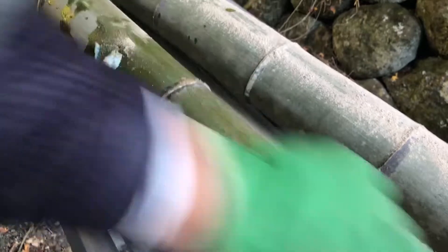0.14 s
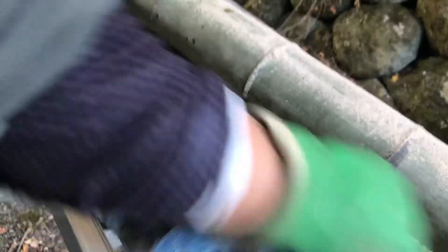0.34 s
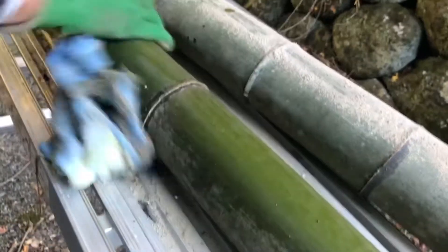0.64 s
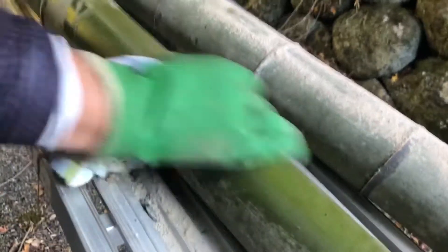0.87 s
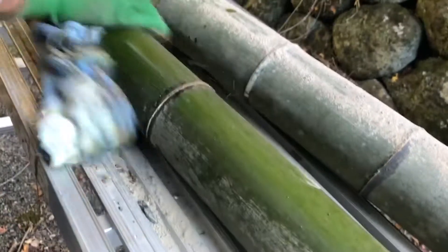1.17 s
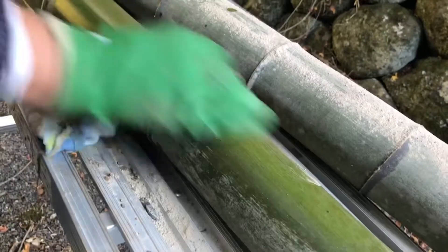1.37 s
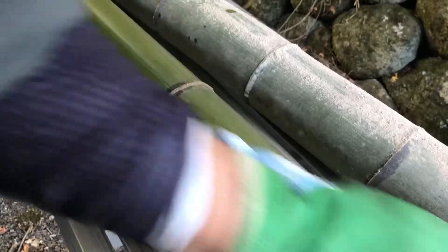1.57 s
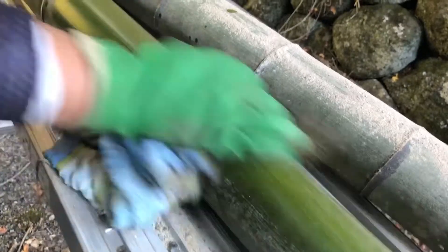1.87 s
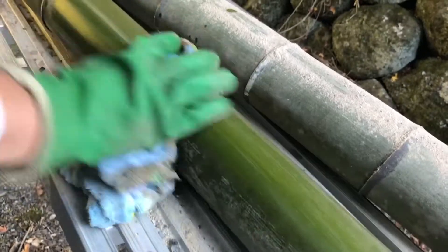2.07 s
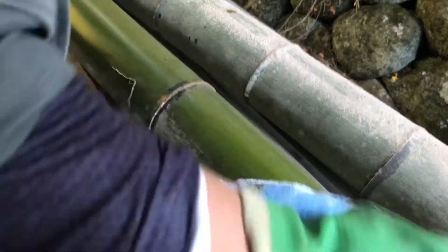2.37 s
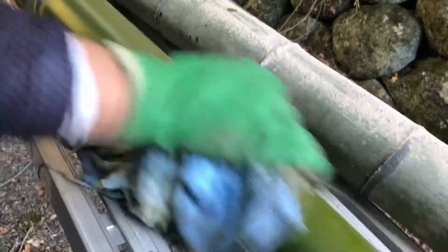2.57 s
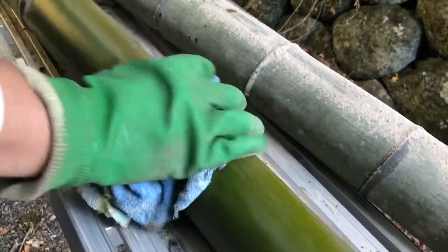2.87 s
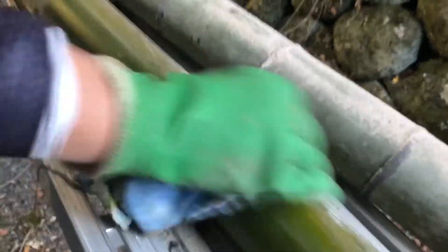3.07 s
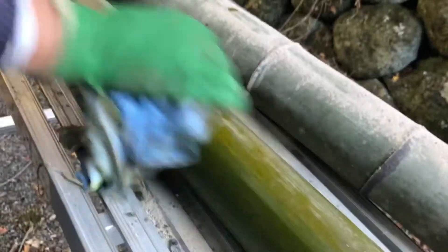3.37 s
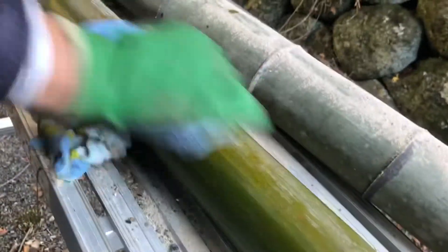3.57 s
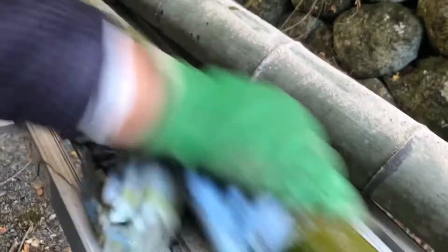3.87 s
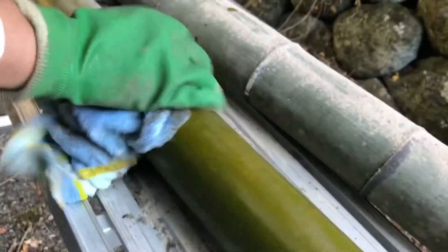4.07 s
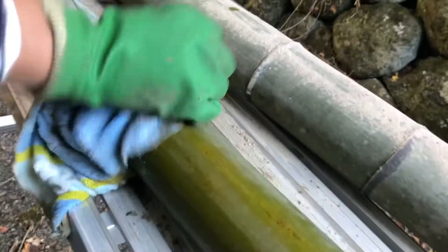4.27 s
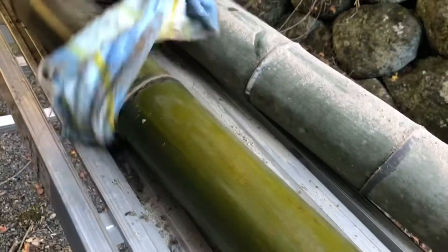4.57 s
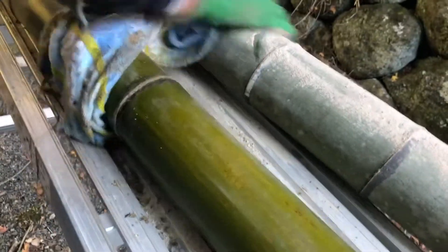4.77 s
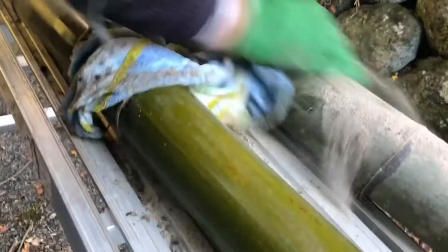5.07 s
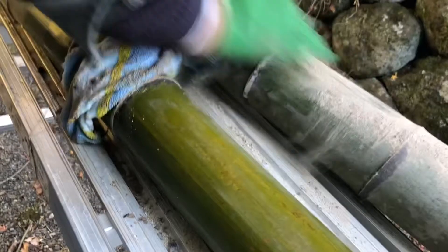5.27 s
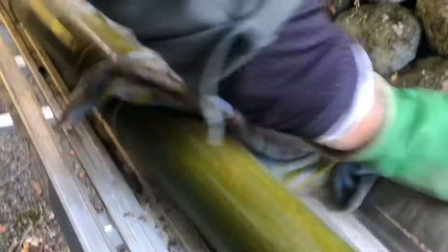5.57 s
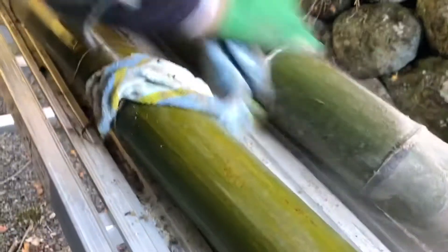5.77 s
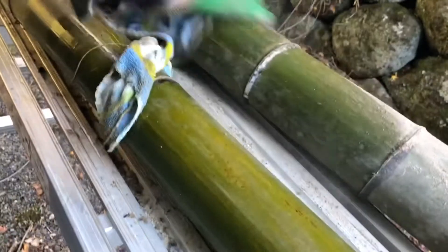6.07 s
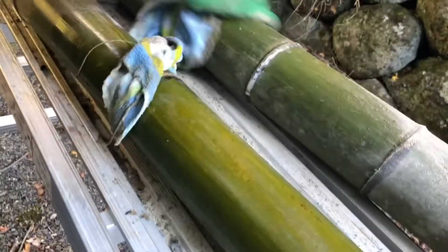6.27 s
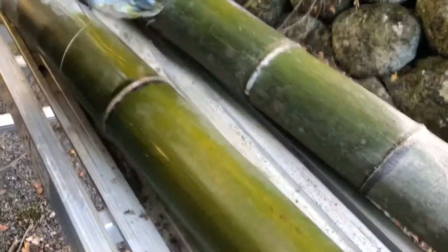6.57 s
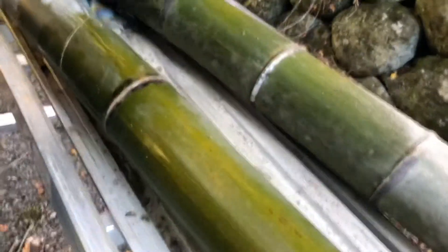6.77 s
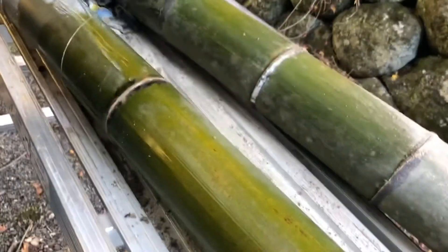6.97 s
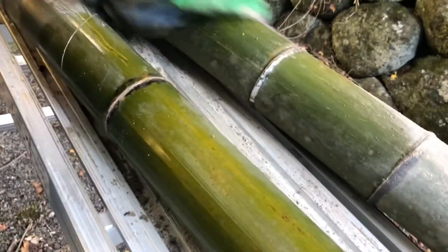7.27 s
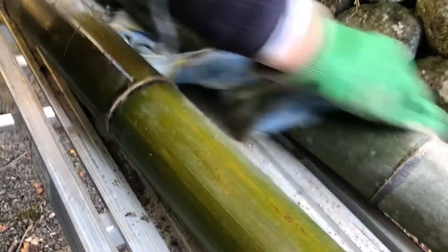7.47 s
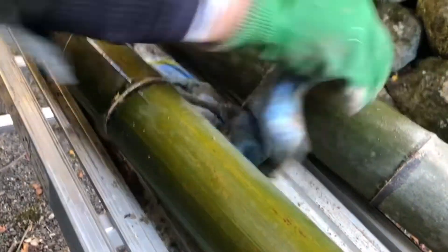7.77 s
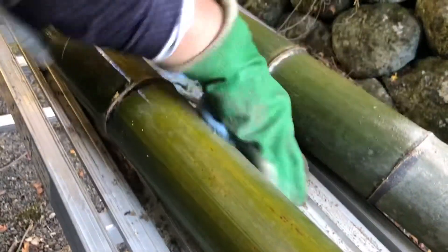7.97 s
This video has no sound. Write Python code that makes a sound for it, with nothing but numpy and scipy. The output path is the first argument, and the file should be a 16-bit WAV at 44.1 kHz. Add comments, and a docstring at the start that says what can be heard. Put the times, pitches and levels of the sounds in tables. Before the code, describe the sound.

Outdoors and very close, a damp cloth rubs a bamboo pole in fast irregular strokes, bright and hissy at first, then softer and coarser. Short rasps, wet ticks and a few hollow knocks break in. Clothing drags over the body-worn microphone, with dull stuttering rumbles and thuds growing heaviest around the middle. Faint, low, steady air lies beneath.

```python
"""Outdoors, a gloved hand scrubs a bamboo pole with a damp cloth, back and forth.
Random fibre slips, coloured into hiss, scrub and fizz, follow the speed of each stroke; snags rasp as
filtered noise bursts, wet ticks are short noise decays, and the pole knocks on its metal rest as damped modes.
The worker's clothing drags on the body-worn microphone as dull stuttering slips and bumps it
with short bursts of low tones. Quiet outdoor air, a steady coloured noise, lies underneath."""
import sys
import numpy as np
from scipy import signal
from scipy.fft import rfft, irfft, next_fast_len
from scipy.io import wavfile
from scipy.ndimage import uniform_filter1d, map_coordinates

SR = 44100
rng = np.random.default_rng(int(sys.argv[2]) if len(sys.argv) > 2 else 0)


def log_audio(samples):
    """Write samples as a 16-bit WAV file to the path given in sys.argv[1]."""
    # one column per channel
    frames = np.atleast_2d(samples).T
    # limit to full scale, then quantise
    limited = np.clip(frames, -1, 1)
    pcm = np.round(limited * 32767).astype(np.int16)
    wavfile.write(sys.argv[1], SR, pcm)


N = 358563  # length of the scene in samples


def amp(db):
    """Decibels to gain."""
    return 10 ** (np.asarray(db) / 20)


def unit(x):
    """Scale to rms 1."""
    return x / np.sqrt(np.mean(x ** 2) + 1e-20)


def wobble(rate, size=0):
    """A smooth random curve, rate knots a second; as long as the scene unless a size is given."""
    size = size or N
    knots = rng.standard_normal(int(size * rate / SR) + 4)
    return map_coordinates(knots, [np.arange(size) * rate / SR])


def releases(rate, fade_s):
    """Sudden random jumps, rate a second, that fade again; mean 0, rms 1."""
    happens = rng.random(N) < rate / SR
    jumps = signal.lfilter([1], [1, -np.exp(-1 / (fade_s * SR))], happens)
    return unit(jumps - jumps.mean())


def slips(rate, spread_db):
    """Tiny stick-slip releases at random times, rate a second, of uneven size; rms 1."""
    happens = rng.random(N) < rate / SR
    size = amp(spread_db * np.clip(rng.standard_normal(N), -2, 2))
    return unit(happens * size * rng.choice([-1, 1], N))


def filtered(x, response):
    """x times a response of frequency."""
    size = next_fast_len(len(x) + 8192)
    spectrum = rfft(x, size) * response(np.fft.rfftfreq(size, 1 / SR))
    return irfft(spectrum, size)[:len(x)]


def coloured(x, spectrum):
    """x shaped by (Hz, dB) points joined along log frequency, at rms 1."""
    f, db = np.transpose(spectrum)
    return unit(filtered(x, lambda hz: amp(np.interp(np.log(hz + 1), np.log(f), db))))


def edge(x, hz, kind, order):
    """Causal low-pass or high-pass."""
    sos = signal.butter(order, min(hz, .45 * SR), kind, fs=SR, output='sos')
    return signal.sosfilt(sos, x)


def add(track, s, sound):
    """Mix a sound into the track at time s."""
    part = track[max(round(s * SR), 0):][:len(sound)]
    part += sound[:len(part)]


def speed(start, length, peak_share):
    """A move speeds up from rest to 1 and slows to rest again, along quarter sines."""
    fastest = start + length * np.clip(peak_share, .05, .95)
    phase = np.interp(np.arange(N) / SR, [start, fastest, start + length], [0, 1, 0])
    return np.sin(np.pi / 2 * phase)


# Strokes of the hand, levels before the layer trims in cloth(): start_s, length_s,
# peak_share (share of the length at which the hand is fastest), hiss_db, scrub_db (re hiss),
# fizz_db (re hiss), easing_db (rate at which pressure eases, per whole stroke; negative presses harder)
STROKES = [(-0.087, 0.38, 0.097, -28.5, -3.5, -2.5, -9), (0.257, 0.22, 0.46, -30, -7, -8, 18),
           (0.41, 0.27, 0.54, -33, -8.5, 2, 3), (0.652, 0.3, 0.64, -30, -10.5, -1, -2),
           (0.944, 0.26, 0.41, -31.0, -10.5, -1, 6), (1.196, 0.28, 0.65, -29.5, -9.5, -1, -3),
           (1.376, 0.3, 0.31, -31, -6.5, -9.5, -8), (1.677, 0.3, 0.27, -31.5, -5, -3, 7),
           (1.995, 0.41, 0.54, -41, -6, -5.5, 7), (2.376, 0.63, 0.077, -45.5, 0, -6, -8),
           (2.698, 0.12, 0.75, -41, -2, -2, 6), (2.926, 0.28, 0.77, -41, 3.0, -7.5, 2),
           (3.187, 0.33, 0.31, -38, -4, -2.5, 5), (3.47, 0.29, 0.76, -36.5, -13, -1.5, 4),
           (3.76, 0.26, 0.35, -35.5, -7.5, -1, 18), (3.983, 0.34, 0.34, -44.5, -3.5, -3, 5),
           (4.399, 0.18, 0.86, -56.5, -14, 3.5, 0.5), (4.654, 0.34, 0.58, -36, -4, -6.5, -6),
           (4.983, 0.21, 0.47, -34.5, -3.5, -1.5, 6), (5.191, 0.372, 0.22, -36.0, 1, -4, -8),
           (5.555, 0.4, 0.28, -35.5, -4, 1.5, 11), (5.955, 0.22, 0.61, -35, -10.5, 4, 1),
           (6.151, 0.46, 0.35, -40.5, -5, 3.5, -11), (6.563, 0.29, 0.39, -40.5, -0.5, 0.5, -3.0),
           (6.84, 0.22, 0.25, -42, -6.5, -0.5, -10), (7.03, 0.35, 0.58, -40.5, -1.5, 1, 8),
           (7.28, 0.31, 0.36, -38.5, -0.5, -2, -9), (7.562, 0.17, 0.61, -44.0, 4, 2.5, 4.0),
           (7.87, 0.14, 0.69, -47, -0.5, 0, 8.0), (8.022, 0.17, 0.44, -42.0, -1, -2.5, -11)]
SPEED_LAW = 1  # friction noise grows as this power of the hand's speed
FIZZ_PER_EASING = 1  # dB of fizz gained for each dB of scrub lost as the hand eases
EASING_FROM = 0.16  # share of a stroke for which the pressure holds before it starts to ease
REST_DB, REST_FIZZ_DB = -55.5, -61.5  # the cloth still creeps between strokes; before the layer trims


def strokes():
    """Gains of hiss, scrub and fizz: all follow the hand's speed; easing the pressure trades scrub for fizz."""
    t = np.arange(N) / SR
    power = np.outer(amp([REST_DB, REST_DB, REST_FIZZ_DB]) ** 2, np.ones(N))
    for start, length, peak_share, db, scrub_db, fizz_db, easing_db in STROKES:
        hand = speed(start, length, peak_share)
        moving = hand > 0
        share = (t[moving] - start) / length
        eased_db = easing_db * (np.maximum(share, EASING_FROM) - .5)  # zero at mid-stroke
        hiss_db = np.zeros_like(eased_db)
        colour = amp([hiss_db, scrub_db - eased_db, fizz_db + FIZZ_PER_EASING * eased_db])
        power[:, moving] += (amp(db) * hand[moving] ** SPEED_LAW * colour) ** 2
    return np.sqrt(power)


# Spectra of the fibre hiss, the coarse scrub and the finest fizz: freq_hz, level_db (relative, per Hz)
HISS_SPECTRUM = [(900, -21), (2000, -16), (3000, -2.5), (4200, 0), (4900, -0.5), (6000, 2), (7300, 1.5),
                 (8700, 1), (10500, -2.5), (14000, -11.5)]
SCRUB_SPECTRUM = [(200, -16), (450, -8), (750, 1), (1200, -1), (1600, 0.5), (2200, -1), (2900, -3),
                  (4500, -7), (9000, -23)]
FIZZ_SPECTRUM = [(6000, -25), (9000, -3.5), (11000, 0), (12500, 1), (14000, 1), (15800, -2)]


def cloth():
    """Countless fibres slip on the cane: a light touch fizzes, a pressed wad scrubs lower and coarser."""
    hiss_gain, scrub_gain, fizz_gain = strokes()
    # snagged threads let go at once, then the grip builds up again
    grip_db = 1.4 * releases(rate=45, fade_s=0.028) + 0.8 * wobble(170)
    fibres = shifting(slips(rate=9000, spread_db=-0.5), depth_db=1.83)
    threads = slips(rate=3000, spread_db=1.5)
    nap = shifting(slips(rate=19000, spread_db=4.5), depth_db=1.5)
    # layer trims in dB: hiss -1.07, fizz 2.1, scrub -1.08
    hiss = amp(-1.07) * hiss_gain * coloured(fibres, HISS_SPECTRUM)
    fizz = amp(2.1) * fizz_gain * coloured(nap, FIZZ_SPECTRUM)
    scrub_sway = amp(1.15 * wobble(35) - 1.08)
    scrub = scrub_sway * scrub_gain * coloured(threads, SCRUB_SPECTRUM)
    return amp(grip_db) * (hiss + fizz + scrub)


def shifting(x, depth_db):
    """The folds of the cloth form passing resonances: patches in time and frequency."""
    z = signal.stft(x, nperseg=512)[2]
    field = rng.standard_normal(z.shape)
    field = uniform_filter1d(field, size=6, axis=0)  # smooth over frequency
    field = uniform_filter1d(field, size=14, axis=1)  # smooth over time
    return signal.istft(z * amp(depth_db * unit(field)), nperseg=512)[1][:N]


# Snags of the cloth on the cane: middle_s, level_db (before a -0.06 dB trim),
# length_s (from the middle until the swell falls to 1/e), bright_hz (low-pass)
CATCHES = [(0.035,-54,0.032,13000), (0.1,-45.5,0.13,1070), (0.171,-26.5,0.0071,1090),
           (0.547,-29,0.015,10000), (0.811,-24,0.011,10000), (1.087,-25.5,0.014,10000),
           (1.342,-26.5,0.016,11600), (1.556,-36.5,0.048,2210), (2.268,-33,0.017,11500),
           (3.043,-27.5,0.013,14500), (3.129,-34,0.01,9100), (3.672,-31.5,0.015,14200),
           (3.707,-32.5,0.022,4530), (4.201,-38.5,0.028,6150), (5.268,-32,0.0092,9300),
           (5.411,-33.5,0.014,3200), (5.782,-36,0.0088,2500), (6.271,-41,0.008,4000), (6.36,-38,0.027,5000),
           (6.674,-31,0.016,5500), (7.204,-32,0.015,13000), (7.409,-26.5,0.0076,11800),
           (7.484,-34,0.014,2180), (7.9,-41,0.012,8000), (7.969,-40.5,0.0064,6000)]
CATCH_LOW_SHARE = 0.14  # lower edge of a rasp as a share of its brightness


def catches():
    """The cloth snags on a joint or a rough patch and tears free with a short rasp."""
    out = np.zeros(N)
    t = np.arange(-SR // 8, SR // 8) / SR
    for s, db, length, bright_hz in CATCHES:
        grain_db = 2 * rng.standard_normal(len(t)) + 3.1 * wobble(218.5, size=len(t))
        grains = rng.standard_normal(len(t)) * amp(grain_db)
        rasp = edge(grains, bright_hz, 'low', order=3)
        rasp = edge(rasp, 620, 'high', order=3)
        rasp = unit(edge(rasp, CATCH_LOW_SHARE * bright_hz, 'high', order=1))
        swell = np.exp(-(t / length) ** 2)
        add(out, s + t[0], amp(db - 0.06) * rasp * swell)
    return out


# Small wet ticks: time_s (each sounds 1.9 ms later), peak_db (before the high-pass)
TICKS = [(1.23, -20.5), (2.5867, -18), (2.6929, -18.5), (4.681, -22), (4.877, -20), (5.5625, -22.5),
         (7.0394, -27.5)]


def ticks():
    """Wet cloth and rubber glove peel off the cane with small ticks: noise with a fast and a slow decay."""
    out = np.zeros(N)
    t = np.arange(SR // 10) / SR
    for s, db in TICKS:
        decay = amp(-60 * t / 0.015) + amp(-2 - 60 * t / 0.088)
        tick = decay * rng.standard_normal(len(t))
        add(out, s + 0.0019, amp(db) * tick / np.abs(tick).max())
    return edge(out, 790, 'high', order=1)


# Knocks of the pole on its rest: start_s, ring_db, clack_db, clack_hz (low-pass), pitch_ratio,
# free_share (share of the free ring time that the hand leaves)
KNOCKS = [(2.552, -31.5, -27, 1700, .82, 0.34), (3.024, -19, -26, 1130, 0.98, 0.62),
          (4.329, -47, -35, 2100, 0.76, 0.63)]
# Modes of pole and rest: pitch_hz (at pitch ratio 1), level_db (re ring), t60_s (ringing free)
POLE_MODES = [(131.8, -2, 1), (260, -4, 0.63), (482, -4, 0.18), (545, 0, 0.53), (740, -5.5, 0.15),
              (1022, -6, 0.19), (1389, -20, .25), (1599, -23, .2)]


def pole():
    """The hollow pole rocks against its rest and rings; the hand damps it and makes the ring shudder."""
    out = np.zeros(N)
    t = np.arange(SR // 2) / SR
    for s, ring_db, clack_db, clack_hz, ratio, free in KNOCKS:
        ring = np.zeros(len(t))
        for hz, db, t60 in POLE_MODES:
            cycles = hz * ratio * t + 0.042 * wobble(53, size=len(t))
            ring += amp(db - 60 * t / (t60 * free)) * np.sin(2 * np.pi * cycles)
        clack = edge(rng.standard_normal(len(t)), clack_hz, 'low', order=4)
        clack = unit(edge(clack, 0.16 * clack_hz, 'high', order=2))
        knock = amp(ring_db) * ring + amp(clack_db - 60 * t / 0.07) * clack
        attack = 1 - np.exp(-t / 0.00065)
        add(out, s, knock * attack)
    return out


# Arm moves that drag clothing over the microphone, levels before the trims in clothing():
# start_s, length_s, rumble_db, flutter_db (re rumble)
DRAGS = [(0.314,0.087,-29,-6), (0.591,0.14,-29.5,-3), (0.837,0.027,-31,-16), (0.98,0.089,-29.5,-9),
         (1.189,0.13,-24.5,-14), (1.361,0.032,-27.5,-8), (1.502,0.061,-24,-11), (1.684,0.059,-28,-13),
         (1.753,0.2,-27.5,-15), (2.287,0.13,-22.5,-8.5), (2.467,0.12,-27,-9.5), (2.606,0.18,-30.5,-17.5),
         (2.881,0.3,-27,-5.5), (3.296,0.22,-19.5,-8), (3.485,0.15,-13,-9), (3.605,0.17,-19,-7),
         (4.017,0.1,-21.5,-19), (4.466,0.4,-24.5,-8), (4.84,0.12,-19,-2.5), (5.006,0.2,-21.5,-1),
         (5.175,0.078,-18,-4.5), (5.306,0.15,-17,-6.5), (5.592,0.089,-27.5,-11.5), (5.902,0.06,-24.5,-9),
         (6.02,0.18,-31,-13), (6.593,0.17,-27.5,-6.5), (6.768,0.047,-28,-20), (7.004,0.061,-25,-22),
         (7.299,0.25,-22,-3.5), (7.493,0.41,-27.5,-7)]
# Light contact of the clothing between drags, joined by straight lines: time_s, rumble_db (before trim)
CONTACT = [(0, -53), (0.16, -55.5), (0.3, -36.5), (1.85, -42.5), (2.1, -51.5), (2.2, -40), (3.3, -39.5),
           (3.85, -42.5), (4.3, -39), (4.45, -29), (5.3, -24.5), (5.55, -38.5), (6.5, -36), (7.3, -35.5),
           (7.95, -29.5), (8.13, -43)]
DRAG_PEAK_SHARE, DRAG_LAW = 0.46, 0.67  # where a drag is fastest; its noise grows as this power of its speed
CONTACT_FLUTTER_DB = -12.5  # flutter re rumble in light contact


def drags():
    """Gains of rumble and flutter: each move of the arm swells and fades over the light contact."""
    contact_s, contact_level = np.transpose(CONTACT)
    contact_db = np.interp(np.arange(N) / SR, contact_s, contact_level)
    power = amp([contact_db, contact_db + CONTACT_FLUTTER_DB]) ** 2
    for start, length, db, flutter_db in DRAGS:
        arm = speed(start, length, DRAG_PEAK_SHARE)
        moving = arm > 0
        power[:, moving] += np.outer(amp([db, db + flutter_db]), arm[moving] ** DRAG_LAW) ** 2
    return np.sqrt(power)


# Spectra of the dull rumble, the flutter and the crumpling fabric: freq_hz, level_db (relative, per Hz)
RUMBLE_SPECTRUM = [(22, -47), (31, -21), (45, -1), (68, 4.5), (105, 1.5), (170, -6), (250, -15.5),
                   (450, -55), (900, -80)]
FLUTTER_SPECTRUM = [(90, -44), (170, 1), (250, 2.5), (380, -6), (550, -12), (850, -28.5), (1400, -40.5),
                    (3000, -86)]
CRUMPLE_SPECTRUM = [(300, -26), (500, 0), (700, -1), (1000, -8), (1400, -12), (2500, -59)]
# small folds give way at random, each lifting the level for a moment; FOLD_DB is the most they can shift it
FOLDS_PER_S, FOLD_FADE_S, FOLD_DB = 14, 0.046, 2.5
CRUMPLE_DB, CRUMPLE_LAW = -4, 1.625  # hard drags crumple the fabric: grows as this power of the flutter gain


def clothing():
    """Fabric stutters over the microphone housing, which passes on only dull thuds."""
    rumble_gain, flutter_gain = drags()
    folds_db = FOLD_DB * np.tanh(releases(FOLDS_PER_S, FOLD_FADE_S))
    lumps_db = 2 * np.tanh(wobble(35)) + folds_db
    rumble = coloured(slips(rate=700, spread_db=2.0), RUMBLE_SPECTRUM)
    rumble = amp(lumps_db + 0.26) * rumble_gain * rumble
    stutter = amp(lumps_db + 6.26 * np.tanh(wobble(60)) - 2.5)
    flutter = flutter_gain * coloured(slips(rate=600, spread_db=1), FLUTTER_SPECTRUM)
    crumple = coloured(slips(rate=350, spread_db=0.0), CRUMPLE_SPECTRUM)
    crumple = amp(CRUMPLE_DB) * flutter_gain ** CRUMPLE_LAW * crumple
    return rumble + stutter * (flutter + crumple)


# Folds of clothing that bump the microphone: start_s, level_db, snap_db (re level, before the part offsets)
BUMPS = [(0.332, -13.5, -37), (0.605, -16.5, -34), (0.629, -14.5, -30), (0.677, -17, -25),
         (1.233, -11, -45), (1.293, -19, -34), (2.315, -10.5, -26.5), (2.383, -19, -20), (2.487, -9.5, -30),
         (2.634, -18, -37), (2.694, -13.5, -56), (2.969, -20, -17), (3.314, -8.5, -22), (3.397, -10.5, -10),
         (3.533, -6, -10.5), (3.554, -4.5, -13), (3.587, -8.5, -18), (3.72, -7.5, -20.5),
         (4.686, -4, -28.5), (4.745, -5, -17), (4.876, -2, -15.5), (4.917, -10.5, -25), (4.98, -9, -25),
         (5.096, -3.5, -23.5), (5.201, -8, -17), (5.319, -11, -4), (5.419, -8, -18), (6.963, -19.5, -31),
         (7.263, -17, -30), (7.345, -9.5, -11.5), (7.431, -5.5, -33), (7.585, -11.5, -47),
         (7.77, -15.5, -23)]
# a fold slips again after about this time (sooner when stiffer), weaker by this much
STUTTER_S, STUTTER_LOSS_DB = 0.00818, 9.5


def bumps():
    """A fold snaps across the housing: a dead knock over a slower push, then a weaker second slip."""
    out = np.zeros(N)
    t = np.arange(SR // 10) / SR
    for s, db, snap_db in BUMPS:
        for slip in range(2):
            stiffness = rng.uniform(0.774, 1.125)  # scales the pitch of all three parts
            turn = 2 * np.pi * stiffness * t
            push = np.sin(150 * turn) * (t / 0.0041) * np.exp(1 - t / 0.0035)
            knock = np.sin(300 * turn) * np.exp(-((t - .005) / 0.0016) ** 2)
            snap = np.sin(680 * turn) * np.exp(-((t - .004) / 0.00089) ** 2)
            # a harder snap feeds the higher parts more
            sizes = amp([-5, 0.36 * snap_db + 4.0, snap_db + 8.5]) * rng.choice([-1, 1], size=3)
            bump = sizes @ np.array([push, knock, snap])
            slip_gain = amp(db - slip * STUTTER_LOSS_DB)
            add(out, s + slip * STUTTER_S / stiffness, slip_gain * bump)
    return edge(out, 2600, 'low', order=4)


# Spectrum of the outdoor air: freq_hz, level_db (relative, per Hz)
AIR_SPECTRUM = [(25, -4), (60, 3.5), (150, -13), (400, -1), (1000, -5), (3000, -20), (15000, -80)]


def air():
    """Quiet outdoor air: steady noise, mostly low, at -54.5 dB rms."""
    return amp(-54.5) * coloured(rng.standard_normal(N), AIR_SPECTRUM)


def scene():
    """All sources over quiet outdoor air, as one channel."""
    scrubbing = cloth() + catches() + ticks() + pole()
    handling = clothing() + bumps()
    return (scrubbing + handling + air())[None]


TOP_HZ = 15800  # band limit


def record(dry):
    """The microphone rounds off the hardest thuds towards 0.75; nothing passes above the band limit."""
    rounded = dry[0] / (1 + (dry[0] / .75) ** 4) ** .25
    return filtered(rounded, lambda hz: hz < TOP_HZ)[None]


dry = scene()
out = record(dry)
log_audio(out)
```